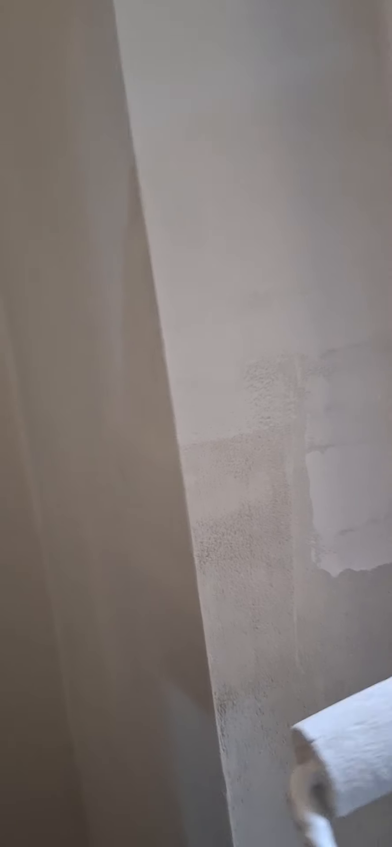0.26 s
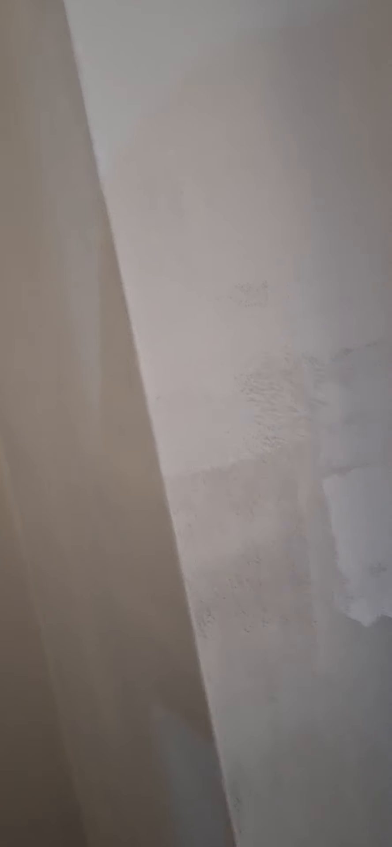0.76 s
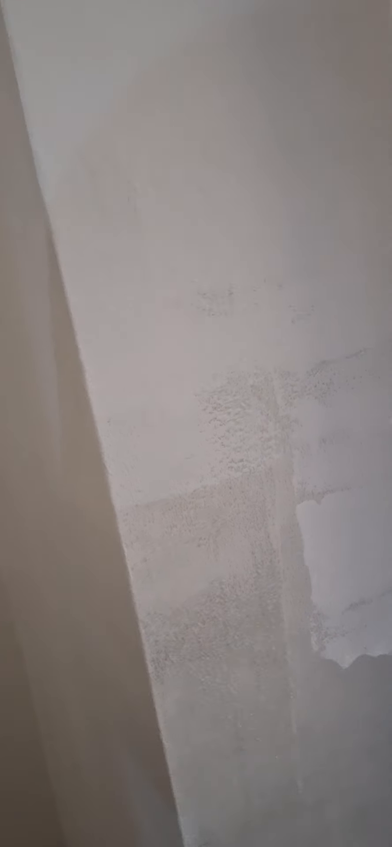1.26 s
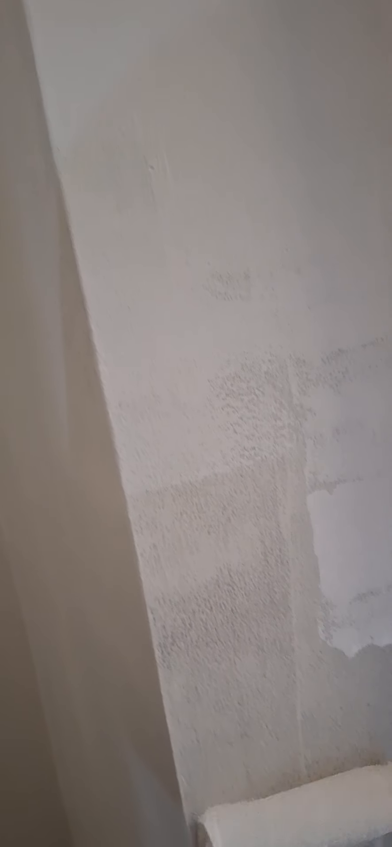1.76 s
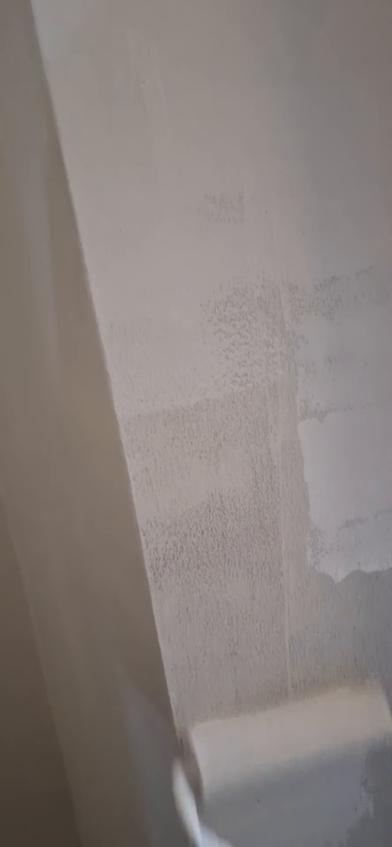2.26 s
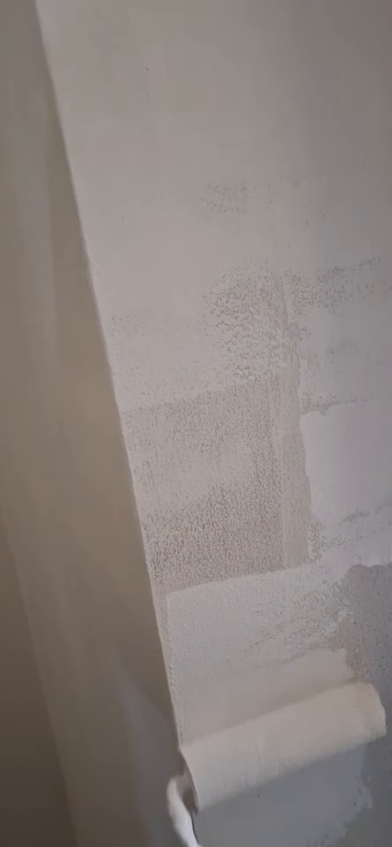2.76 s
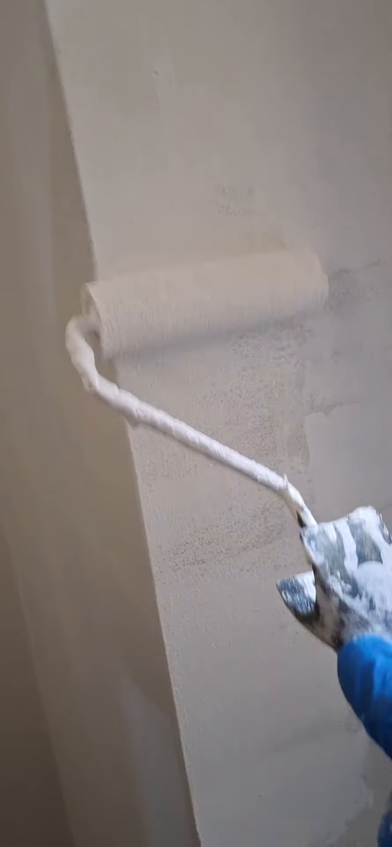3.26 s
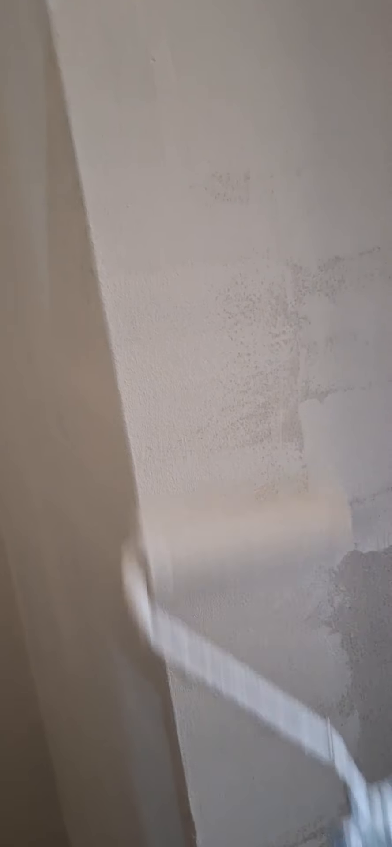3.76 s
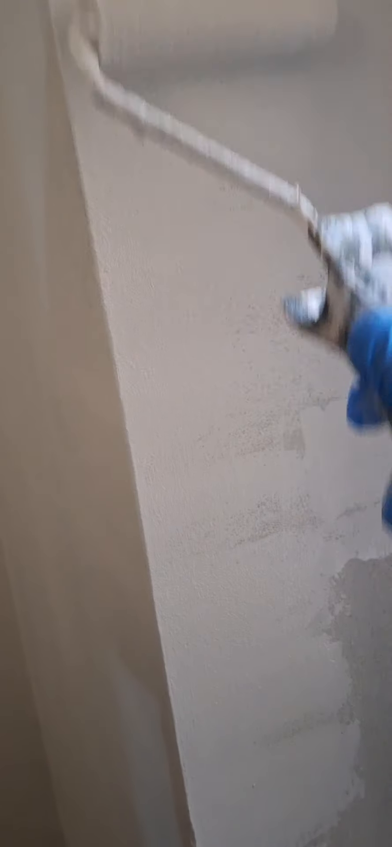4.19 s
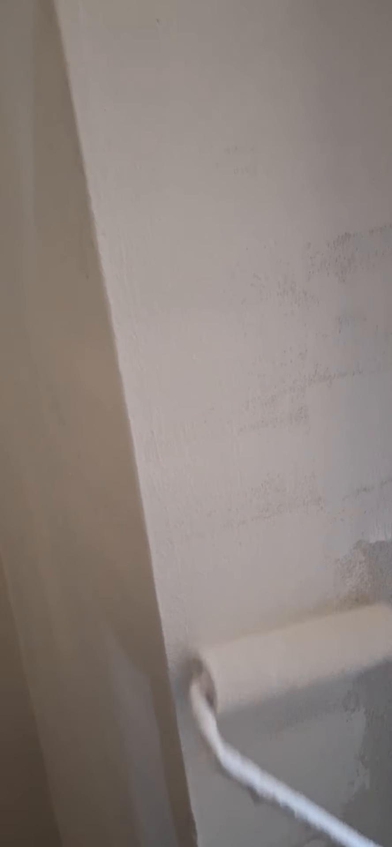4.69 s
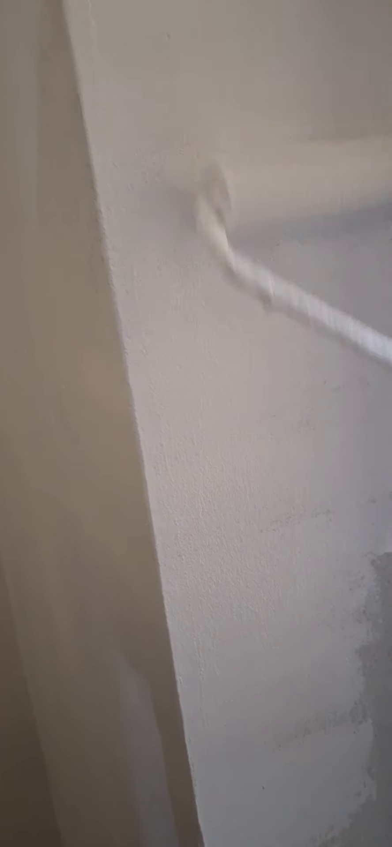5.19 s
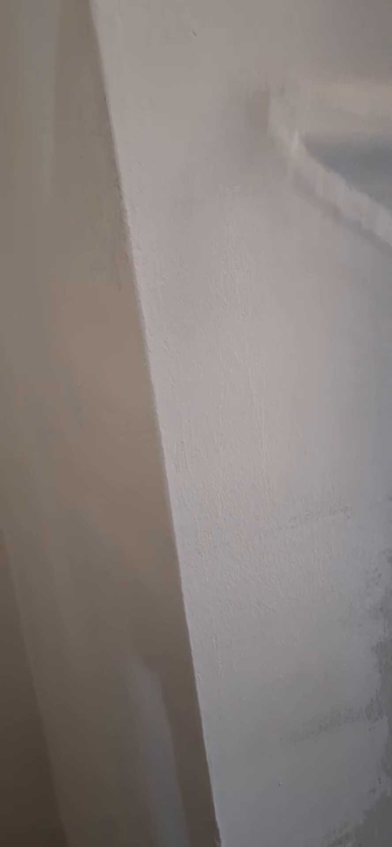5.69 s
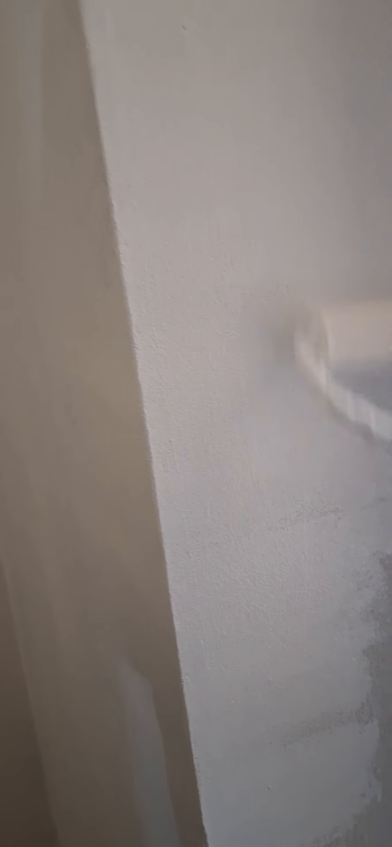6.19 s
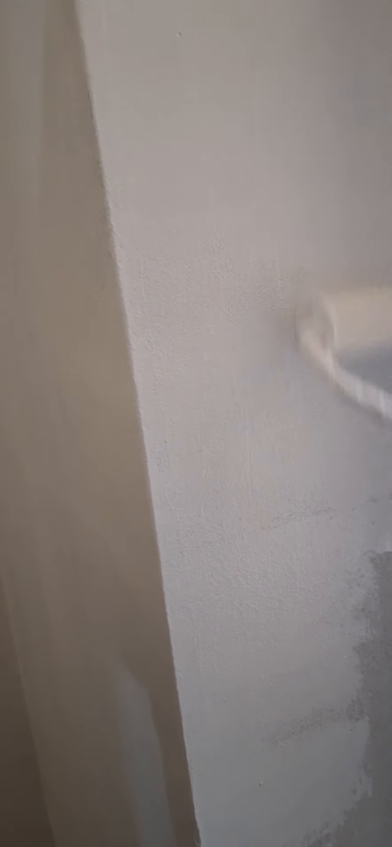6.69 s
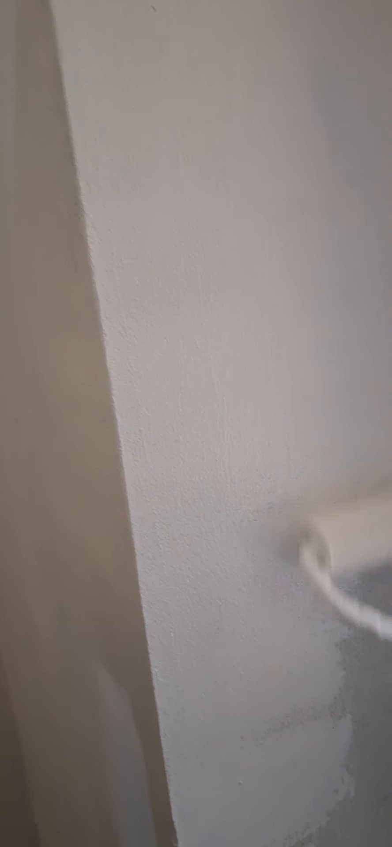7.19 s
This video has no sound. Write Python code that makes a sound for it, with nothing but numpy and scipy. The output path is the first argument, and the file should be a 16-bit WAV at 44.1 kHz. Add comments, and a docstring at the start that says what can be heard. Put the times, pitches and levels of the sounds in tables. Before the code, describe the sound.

A wet paint roller dabs a wall, then rolls back and forth with a sticky sizzle over a low room rush.

```python
"""One wet dab of a paint roller on a wall, then short hesitant pushes that open into long strokes.
Threads of tacky paint snap behind the sleeve in a dense sizzle, close on the right, with a few sharper
cracks from thick threads. Underneath, the nap rubs and the wall drums softly.
The bare room answers the roller and has a steady low rush of its own."""
import sys
import numpy as np
from scipy import signal
from scipy.fft import rfft, irfft, next_fast_len
from scipy.io import wavfile
from scipy.ndimage import map_coordinates

SR = 44100
rng = np.random.default_rng(int(sys.argv[2]) if len(sys.argv) > 2 else 0)


def transcribe(signal):
    """Save signal, clipped to [-1, 1], as a 16-bit WAV file at the path in sys.argv[1]."""
    frames = np.atleast_2d(signal).T
    limited = np.clip(frames, -1, 1)
    pcm = np.round(limited * 32767).astype(np.int16)
    wavfile.write(sys.argv[1], SR, pcm)


N = 328545

# arm swings: (start [s], speeding up [s], slowing down [s], relative level [dB], nap rub trim [dB])
STROKES = [(1.21, .47, .09, -40.5, 1.5), (1.822, 0.12, 0.16, -35, -3), (2.074, 0.06, 0.12, -33.5, -3),
           (2.213, 0.077, 0.25, -32.5, -3), (2.53, 0.18, 0.11, -33, -5), (2.795, 0.23, 0.11, -29.5, -5),
           (3.092, 0.12, 0.092, -29.5, -9), (3.301, 0.24, 0.15, -27, -7), (3.675, 0.16, 0.39, -24.5, -8),
           (4.215, 0.29, 0.25, -25, -6), (4.722, 0.16, 0.3, -24.5, -8), (5.176, 0.19, 0.12, -26, -7),
           (5.48, .17, 0.17, -25, -8.2), (5.82, 0.19, 0.16, -27, -6), (6.155, 0.14, .11, -29, -5),
           (6.42, 0.16, .062, -31, -4), (6.641, 0.13, .12, -32.5, -3), (6.888, 0.14, 0.14, -27.5, -5.5),
           (7.09, 0.11, 0.31, -29, -4.5)]
# wet patches of the sleeve that stick and peel off: (start [s], hold [s], relative level [dB])
WET_PATCHES = [(1.598, .008, -43), (1.68, .03, -41), (1.976, 0.058, -38.5), (2.116, .012, -33.5),
               (2.301, .011, -30.5), (2.828, 0.023, -35.5), (2.945, 0.037, -33.5), (3.12, .019, -34.5),
               (3.534, 0.081, -36.5), (3.88, .075, -40), (4.43, 0.022, -37.5), (6.034, 0.0073, -33.5),
               (6.528, 0.016, -38)]
# thick threads of paint letting go: (time [s], relative level [dB])
THICK_THREADS = [(1.566, -20.5), (1.663, -21), (2.126, -13.5), (3.914, -15), (6.039, -15), (6.047, -3),
                 (6.535, -7)]
# tone of the tearing paint, the rubbing nap and the opening dab: (frequency [Hz], relative level [dB])
SIZZLE_EQ = [(1500, -51), (4000, -15.5), (7400, -4), (8600, -7.5), (10000, -3.5), (12300, 2), (15000, 2.7),
             (16000, -2.5)]
NAP_EQ = [(300, -23), (900, -2.5), (1500, -7.5), (2500, -6.5), (3300, -3.5), (4300, 1.5), (6000, -1),
          (7900, -1), (8700, -14.5), (12000, -10)]
SQUELCH_EQ = [(400, -5), (1000, -10), (1600, -2), (2600, -8), (4000, -7), (7500, -8.5), (8700, -10),
              (10500, -9), (11800, 2.5), (13500, -6), (15800, 1)]
# the roller's travel, ahead of PAN_DEPTH: (time [s], left minus right [dB])
ROLLER_PAN = [(1.3, -11), (2.0, -13.5), (4.2, -12.5), (6.4, -12), (7.45, -14)]
# how strongly each band follows that pan: (frequency [Hz], depth [factor])
PAN_DEPTH = [(500, 0), (2000, 0.00081), (4200, 0.51), (7000, 0.45), (8000, 0.22), (9000, .55),
             (10500, 0.84), (12300, 1.2), (15800, 1.2)]
# drumming from pressure on the wall: (time [s], relative level [dB])
WALL_PRESSURE = [(0, -35.5), (0.35, -42), (0.55, -30.5), (1.3, -41), (1.68, -32.5), (1.85, -40),
                 (2.02, -33), (2.2, -38.5), (2.35, -33), (2.85, -38), (3.85, -36.5), (4.7, -40), (5, -32.5),
                 (5.38, -29.5), (5.58, -37.5), (5.77, -28), (6.1, -37), (6.33, -30), (6.85, -37),
                 (7.15, -28.5), (7.44, -35)]
# modes of the wall panel: (frequency [Hz], width [Hz], relative level [dB])
WALL_MODES = [(57.7, 14, -5), (88, 29, -9), (106.3, 14.7, 2), (144, 53, -12), (169, 20, -12),
              (202, 36, -10.5), (440, 44, -25)]
# the bare room's tail: (frequency [Hz], time to fall 60 dB [s])
ROOM_DECAY = [(200, .5), (2000, 0.45), (8000, 0.071), (15000, .14)]
# tone of the room's rush and rumble: (frequency [Hz], relative level [dB])
RUSH_EQ = [(120, -20), (200, -5), (280, -7), (420, -3.5), (530, -6.5), (700, -6.5), (1400, -10.5),
           (2400, -10.5), (4000, -13), (7700, -15), (8700, -22), (10200, -22.5), (12400, -19.5),
           (15800, -20.5)]
RUMBLE_EQ = [(20, -36), (32, -16), (45, -2.5), (57, 0), (72, 0), (110, -10), (155, -5.5), (200, -6),
             (260, -39), (500, -30.5)]
# balance of the rush: (frequency [Hz], left minus right [dB])
RUSH_PAN = [(200, 1.5), (700, 0.5), (1200, 2), (2400, -1.5), (4400, -3.5), (7500, -1), (9500, -5),
            (15000, -42)]
# stereo likeness of the rush: (frequency [Hz], left-right correlation [-1 to 1])
RUSH_LIKENESS = [(150, 0.44), (350, 0.85), (700, 0.47), (1300, 0.056), (3000, 0.2), (10000, -0.24)]
# hollow resonances in the rush: (frequency [Hz], width [Hz], lift [dB])
WHIRR_PEAKS = [(1635, 83, 3.5), (1802, 42, 4.5), (1990, 57, 5)]
# slow swell of the rumble: (time [s], level [dB])
RUMBLE_SWELL = [(0, -45), (2.4, -42), (3.5, -37), (4.3, -39), (7.45, -41)]


def roller(tack=1.25, tear_growth=1.3, thread_density=14000, spread_db=4.5, sizzle_db=4, nap_db=3):
    """The nap rubs in step with speed; the paint tears ever more densely until the sizzle levels off."""
    rolling = rubbing = 0
    for start, speeding, slowing, db, rub_db in STROKES:
        speed = arm_swing(start, speeding, slowing)
        rolling += amp(db) * np.tanh(tack * speed ** tear_growth)
        rubbing += amp(db + rub_db) * speed
    coat = amp(1.1 * wobble(per_second=90) + 0.24 * wobble(per_second=14))  # uneven paint: flutter
    patches = sticking(WET_PATCHES)
    peeling = rolling * coat + patches
    peel_rate = peeling / np.max(rolling)
    tearing = pops(thread_density * (peel_rate + 0.058), spread_db)
    sizzle = amp(sizzle_db) * peeling * unit(coloured(tearing, SIZZLE_EQ))
    fibres = pops(thread_density * (peel_rate + 0.3), spread_db)
    friction = rubbing * coat * amp(0.6 * wobble(per_second=14)) + patches * amp(-6.5)
    nap = amp(nap_db) * friction * unit(coloured(fibres, NAP_EQ))
    return sizzle + nap + thread_snaps()


def arm_swing(start, speeding, slowing):
    """Speed of one swing, 0-1: a quarter sine up from rest and another back down to the turn."""
    ramp = np.interp(np.arange(N) / SR - start, [0, speeding, speeding + slowing], [0, 1, 0])
    return np.sin(np.pi / 2 * ramp)


def sticking(patches, rise_s=0.0013, fall_s=0.0072):
    """Envelope of brief touches: the sleeve sticks, holds and peels off."""
    t = np.arange(N) / SR
    envelope = np.zeros(N)
    for start, hold, db in patches:
        attack = np.clip((t - start) / rise_s, 0, 1)
        release = np.exp(-np.maximum(t - start - hold, 0) / fall_s)
        envelope += amp(db) * attack * release
    return envelope


def thread_snaps(decay_s=0.0004, trim_db=-5.02):
    """Each thick thread of paint lets go with one very short, bright crack."""
    cracks = np.zeros(N)
    t = np.arange(SR // 100) / SR
    for start, db in THICK_THREADS:
        burst = rng.standard_normal(len(t)) * np.exp(-t / decay_s)
        cracks[round(start * SR):][:len(t)] += amp(db + trim_db) * burst
    return coloured(cracks, SIZZLE_EQ)


def first_dab(start_s=0.492, hold_s=0.047, level_db=-21, fade_db=7):
    """A short wet squelch, full in the mids and far right, that weakens as the sleeve settles."""
    settling = amp(-fade_db * np.clip((np.arange(N) / SR - start_s) / hold_s, 0, 1))
    pressing = sticking([(start_s, hold_s, level_db)], rise_s=0.0062, fall_s=0.017) * settling
    squelch = pressing * unit(coloured(pops(per_second=27000, spread_db=4), SQUELCH_EQ))
    return pan(-17) * close_on_right(squelch)


def wall_drum(trim_db=-3):
    """The turning sleeve shakes the low modes of the wall, a little to the left."""
    def panel(hz):
        return sum((-1) ** k * amp(db) * 1j * hz * width / (centre ** 2 - hz ** 2 + 1j * hz * width)
                   for k, (centre, width, db) in enumerate(WALL_MODES))
    soft_contact = [(20, -25), (50, 1.5), (450, 0.5), (1200, -5)]  # (frequency [Hz], gain [dB])
    drum = unit(coloured(filtered(rng.standard_normal(N), panel), soft_contact))
    return pan(3) * amp(automation(WALL_PRESSURE) + trim_db) * drum


def travelling(stereo):
    """The left side is shaded in the treble, more or less as the roller travels."""
    hz, t, bands = signal.stft(stereo, SR, nperseg=256)
    pan_db = at_pitch(PAN_DEPTH, hz)[:, None] * np.interp(t, *np.transpose(ROLLER_PAN))
    return signal.istft(bands * pan(pan_db).reshape(bands.shape), SR, nperseg=256)[1][:, :N]


def close_on_right(x, direct_db=5):
    """The right side gets the direct sound over the reverb; the left hears only the room."""
    left, right = room_reverb(x)
    direct = amp(direct_db)
    return np.array([left, (right + direct * x) / np.hypot(1, direct)])


def room_reverb(x, early_s=0.0072, tail_db=-5):
    """Each band's energy scatters off the near wall, then dies in a diffuse tail, treble first."""
    hz, t, bands = signal.stft(x, SR, nperseg=128)
    delay = t[t < 0.5]
    early = np.exp(-delay / early_s)
    tail = amp(-60 * delay / at_pitch(ROOM_DECAY, hz)[:, None]) ** 2
    decay = early / early.sum() + amp(tail_db) ** 2 * tail / tail.sum(axis=1, keepdims=True)
    energy = np.abs(signal.fftconvolve(np.abs(bands) ** 2, decay, axes=1))[:, :len(t)]
    scatter = signal.stft(rng.standard_normal((2, N)), nperseg=128)[2]
    reverb = signal.istft(scatter * np.sqrt(energy), nperseg=128)[1][:, :N]
    return unit(reverb) * np.std(x)


def room_rush(level_db=-35, drift_db=0.6):
    """A wide bed of air with a faint hollow whirr; its level wavers slightly."""
    def stereo_width(hz):
        angle = np.arccos(at_pitch(RUSH_LIKENESS, hz)) / 2
        return np.array([np.cos(angle), np.sin(angle)])

    def whirr_and_pan(hz):
        lift_db = sum(db / (1 + (2 * (hz - centre) / width) ** 2) for centre, width, db in WHIRR_PEAKS)
        return amp(lift_db) * pan(at_pitch(RUSH_PAN, hz))
    noise = coloured(rng.standard_normal((2, N)), RUSH_EQ)
    mid, side = filtered(noise, stereo_width)
    rush = unit(filtered(np.array([mid + side, mid - side]), whirr_and_pan))
    return amp(level_db + drift_db * wobble(per_second=4.65)) * rush


def room_rumble():
    """A low mono rumble that swells slowly and leans left."""
    rumble = unit(coloured(rng.standard_normal(N), RUMBLE_EQ))
    return pan(4) * amp(automation(RUMBLE_SWELL)) * rumble


def pops(per_second, spread_db):
    """Random tiny ruptures of log-normal size; the power stays level whatever their rate."""
    chance = np.clip(per_second / SR, 1e-4, 1)
    hits = rng.random(N) < chance
    polarity = np.sign(rng.standard_normal(N))
    size = amp(spread_db * np.clip(rng.standard_normal(N), -2, 2))
    return unit(hits * polarity * size / np.sqrt(chance))


def wobble(per_second):
    """A smooth curve through evenly spaced random knots."""
    knots = rng.standard_normal(int(N * per_second / SR) + 4)
    return map_coordinates(knots, [np.arange(N) * per_second / SR])


def automation(points):
    """A (time [s], value) curve, drawn out to one value a sample."""
    return np.interp(np.arange(N) / SR, *np.transpose(points))


def at_pitch(points, hz):
    """A (frequency [Hz], value) curve read on a log axis."""
    frequencies, values = np.transpose(points)
    return np.interp(np.log(hz + 1), np.log(frequencies), values)


def filtered(x, response):
    """x through a frequency response."""
    size = next_fast_len(N + SR // 2)
    return irfft(rfft(x, size) * response(np.fft.rfftfreq(size, 1 / SR)), size)[..., :N]


def coloured(x, eq):
    """x through a (frequency [Hz], gain [dB]) curve."""
    return filtered(x, lambda hz: amp(at_pitch(eq, hz)))


def pan(db):
    """Constant-power stereo gains for left minus right in dB."""
    pair = np.array([amp(db / 2), amp(-db / 2)]).reshape(2, -1)
    return pair / np.sqrt(np.mean(pair ** 2, axis=0))


def amp(db):
    """Decibels to gain."""
    return 10 ** (np.asarray(db) / 20)


def unit(x):
    """Scale to rms 1."""
    return x / np.sqrt(np.mean(x ** 2) + 1e-20)


def scene():
    """Dab and strokes up front, the wall beneath them, room tone behind."""
    painting = first_dab() + travelling(close_on_right(roller()))
    return painting + wall_drum() + room_rush() + room_rumble()


def record(dry, top_hz=15900):
    """A brick-wall low-pass takes off the very top of the mix."""
    return filtered(dry, lambda hz: hz < top_hz)


dry = scene()
out = record(dry)
transcribe(out)
```